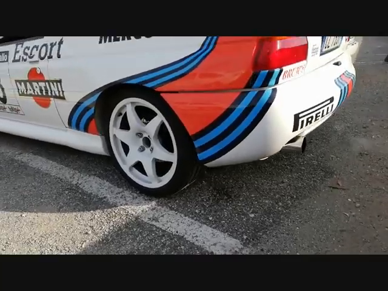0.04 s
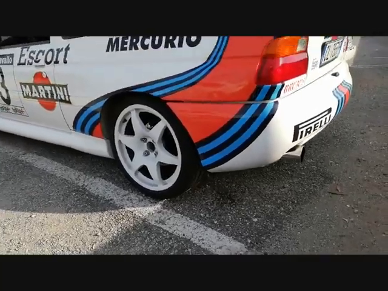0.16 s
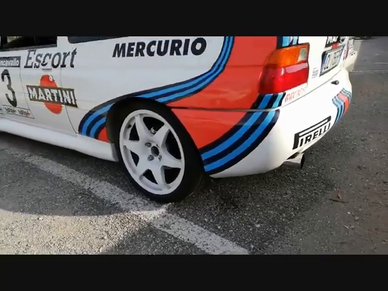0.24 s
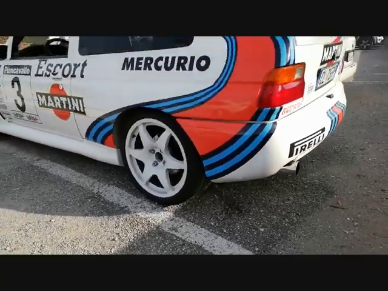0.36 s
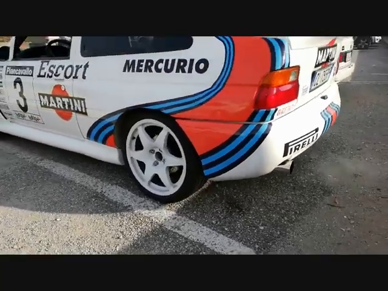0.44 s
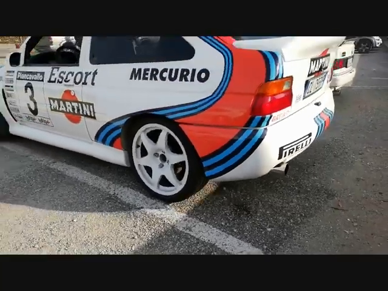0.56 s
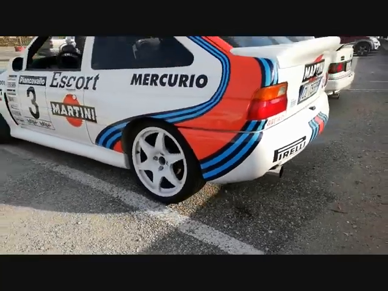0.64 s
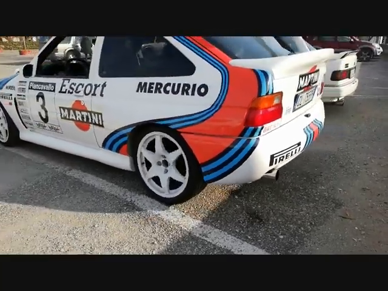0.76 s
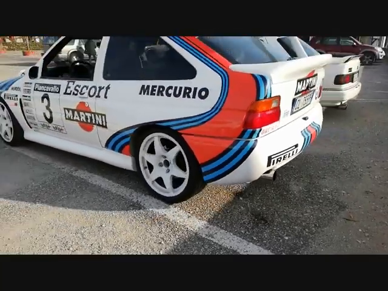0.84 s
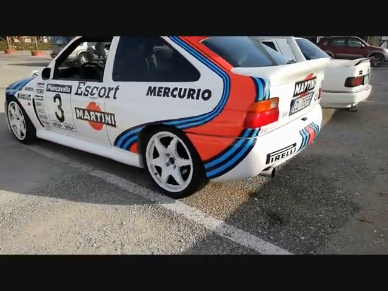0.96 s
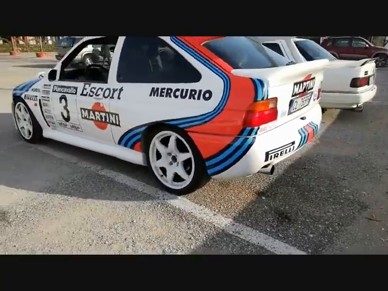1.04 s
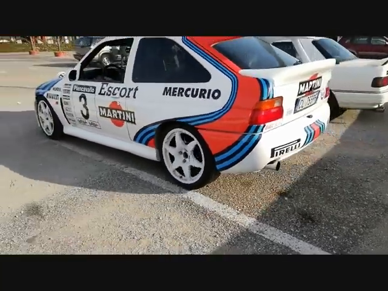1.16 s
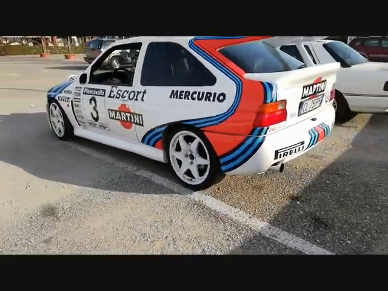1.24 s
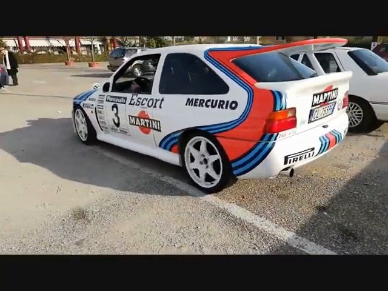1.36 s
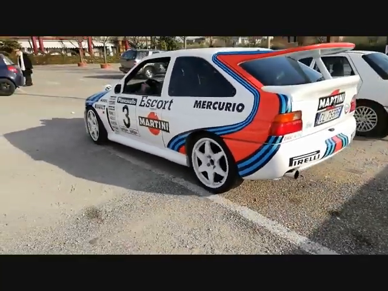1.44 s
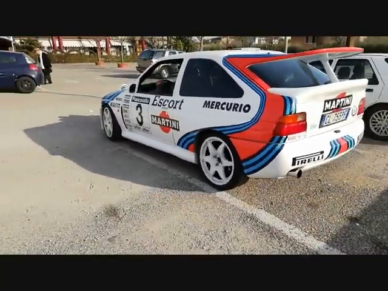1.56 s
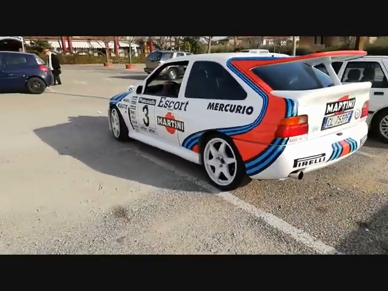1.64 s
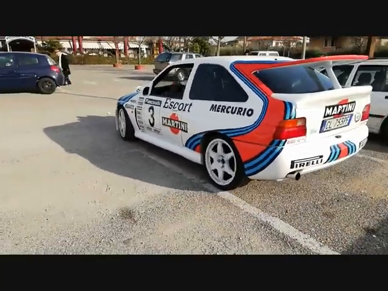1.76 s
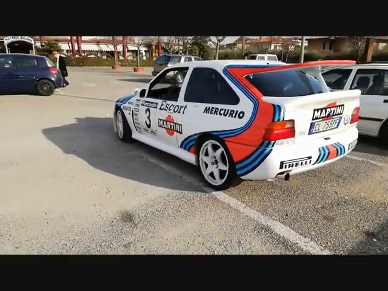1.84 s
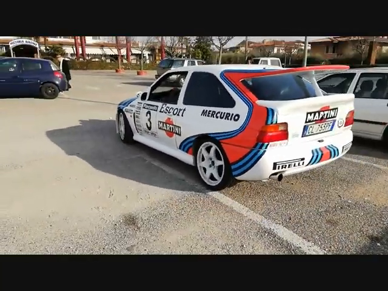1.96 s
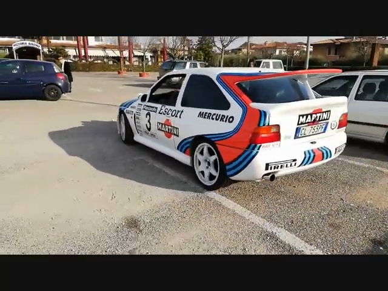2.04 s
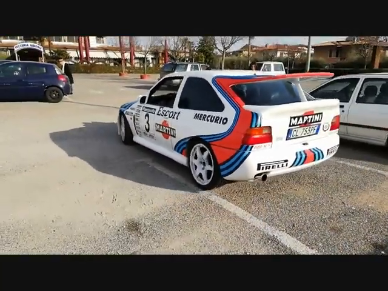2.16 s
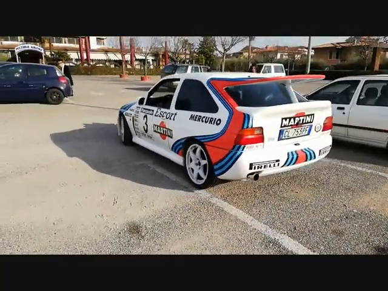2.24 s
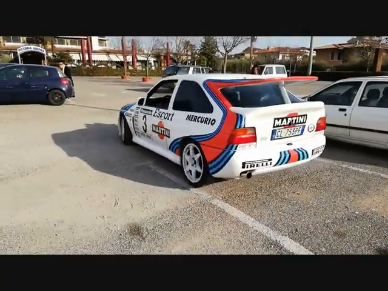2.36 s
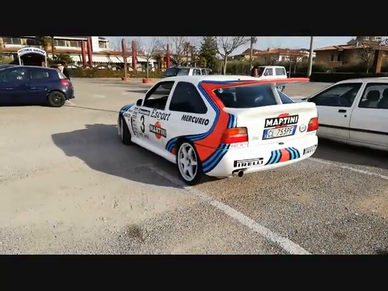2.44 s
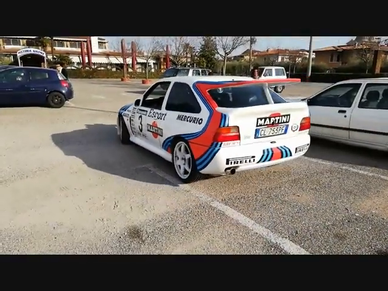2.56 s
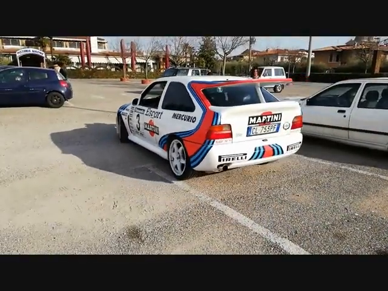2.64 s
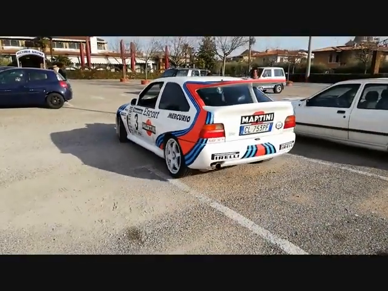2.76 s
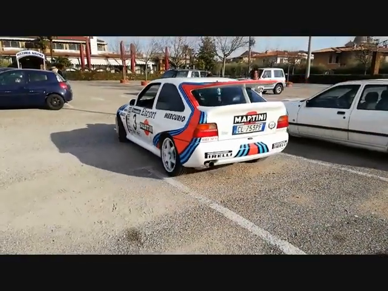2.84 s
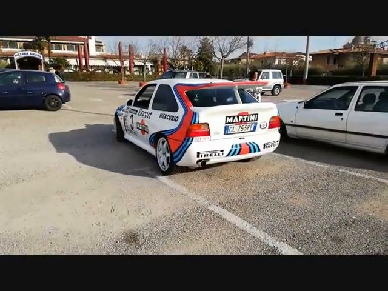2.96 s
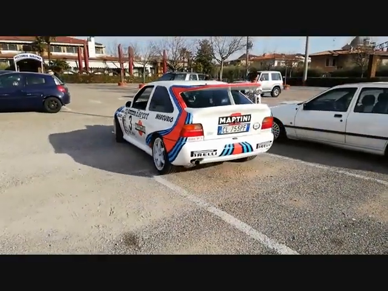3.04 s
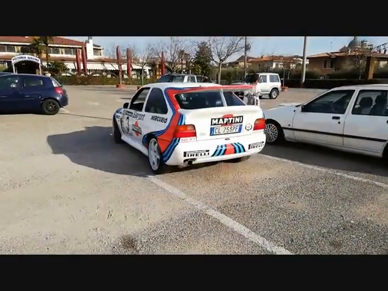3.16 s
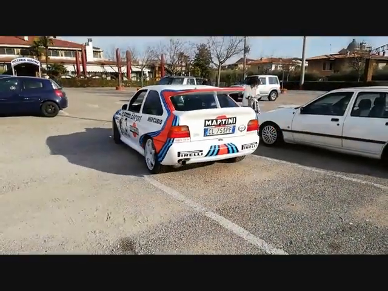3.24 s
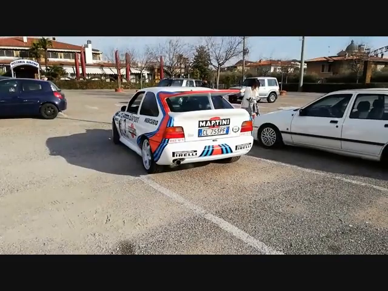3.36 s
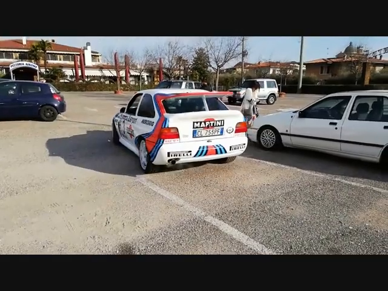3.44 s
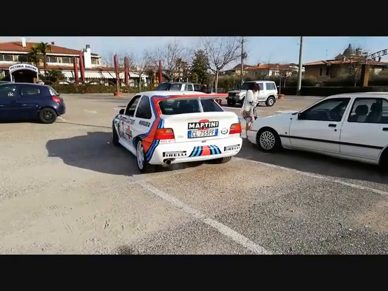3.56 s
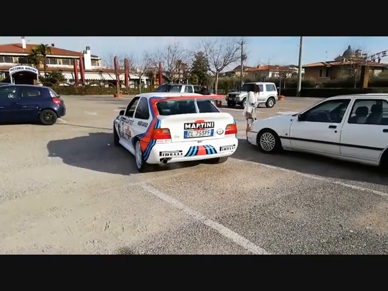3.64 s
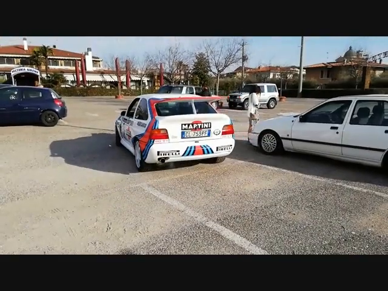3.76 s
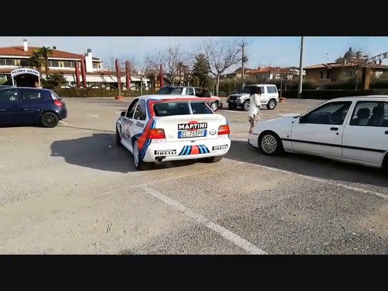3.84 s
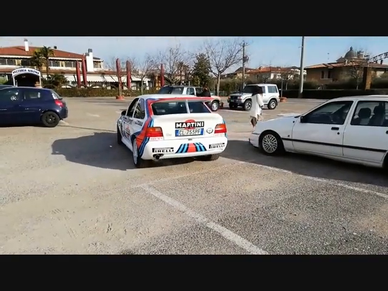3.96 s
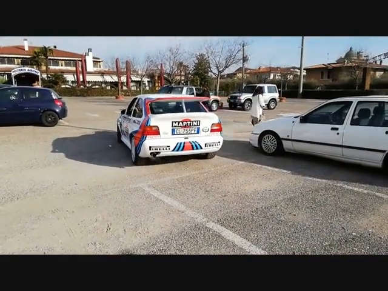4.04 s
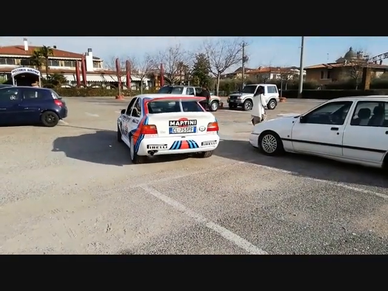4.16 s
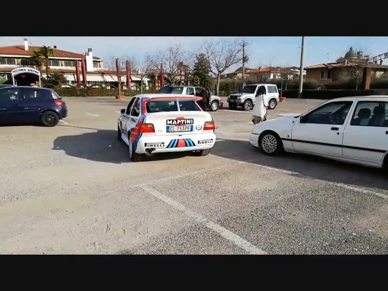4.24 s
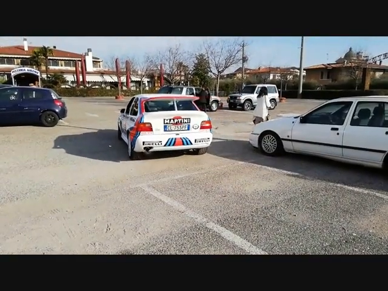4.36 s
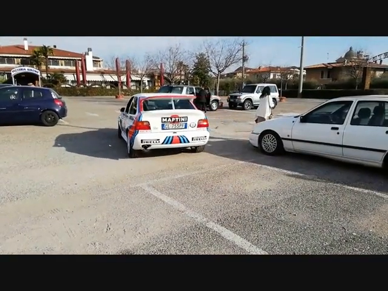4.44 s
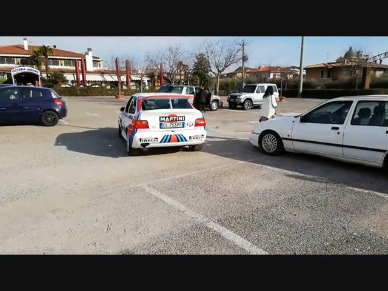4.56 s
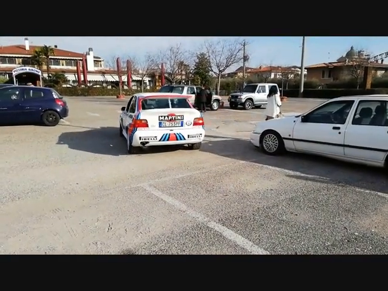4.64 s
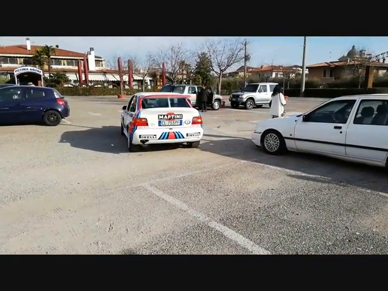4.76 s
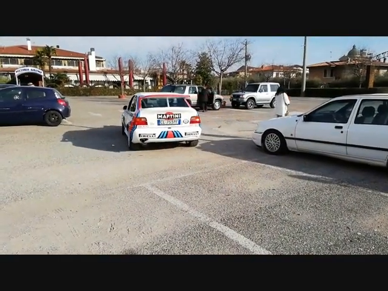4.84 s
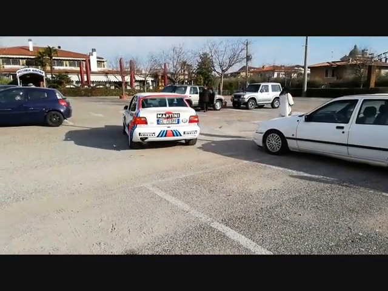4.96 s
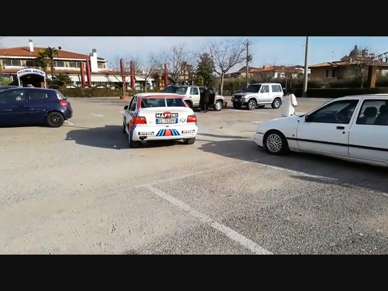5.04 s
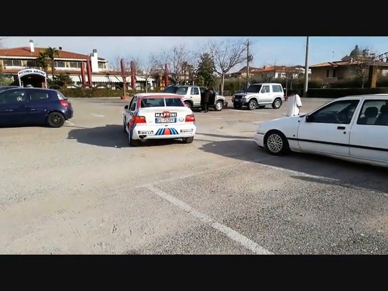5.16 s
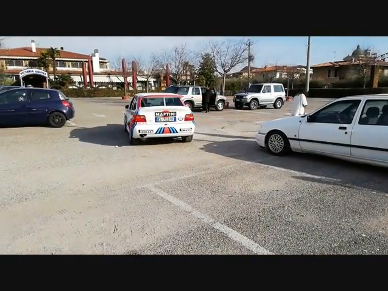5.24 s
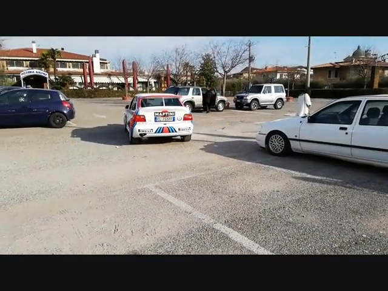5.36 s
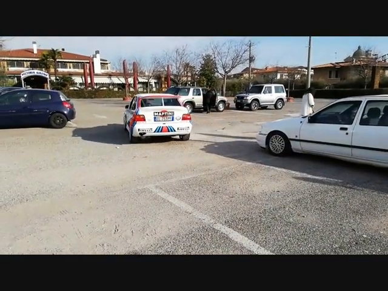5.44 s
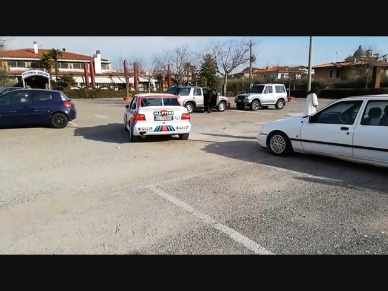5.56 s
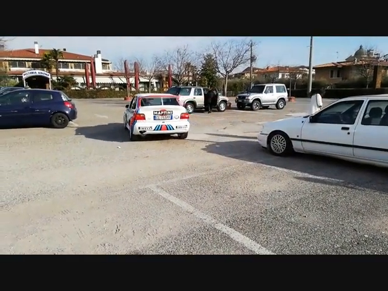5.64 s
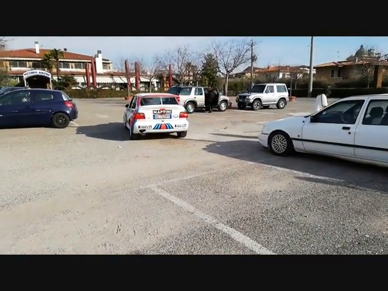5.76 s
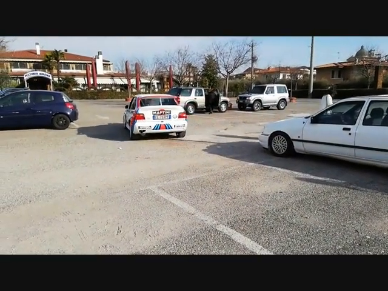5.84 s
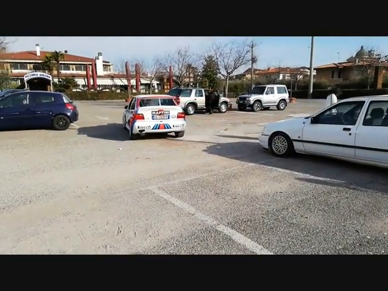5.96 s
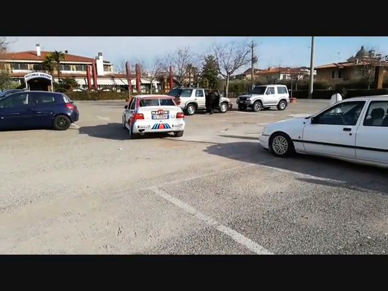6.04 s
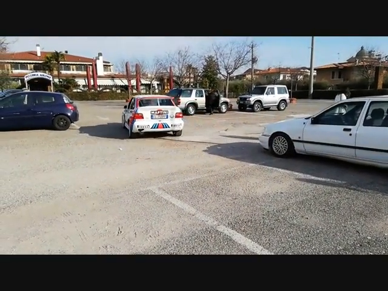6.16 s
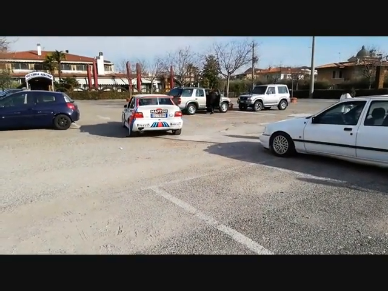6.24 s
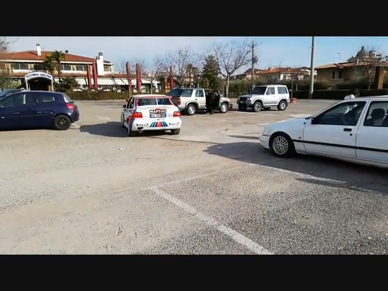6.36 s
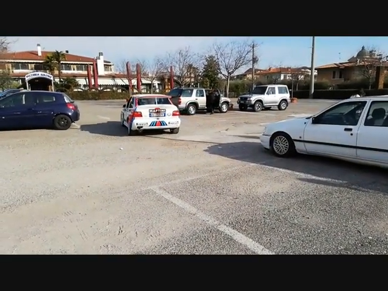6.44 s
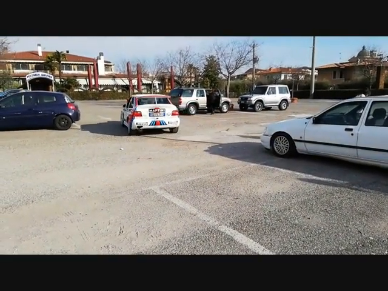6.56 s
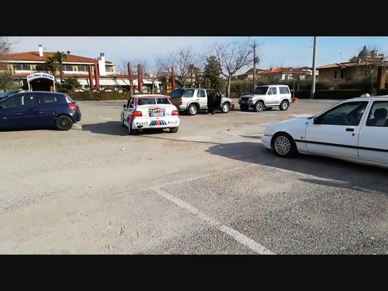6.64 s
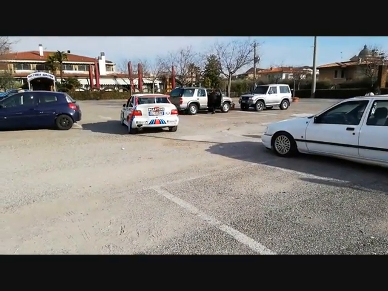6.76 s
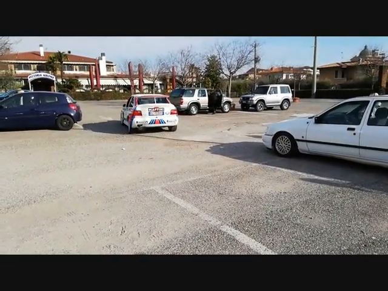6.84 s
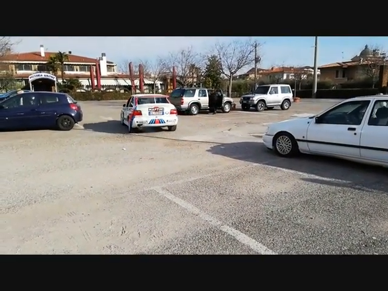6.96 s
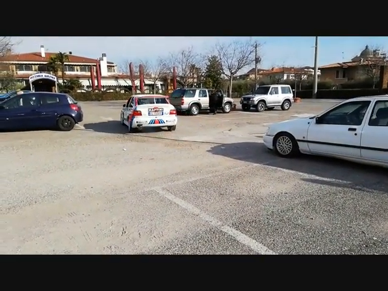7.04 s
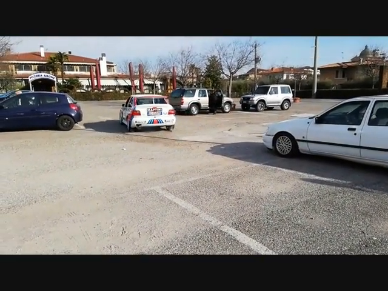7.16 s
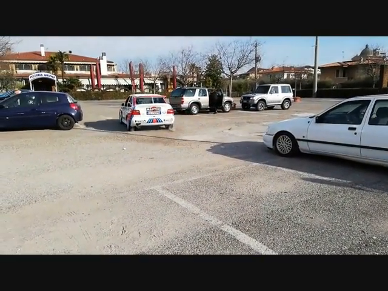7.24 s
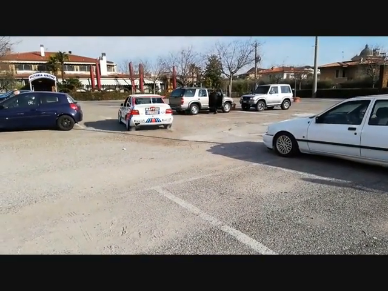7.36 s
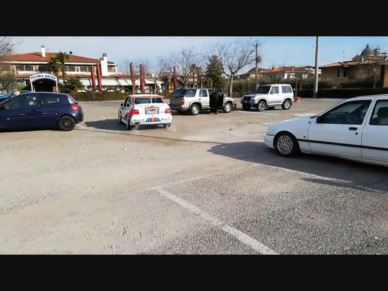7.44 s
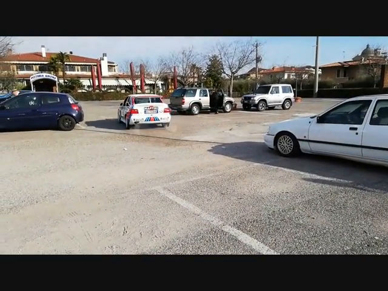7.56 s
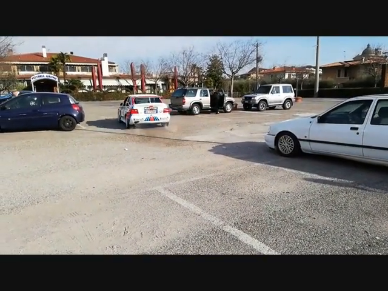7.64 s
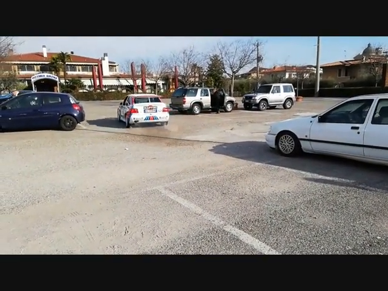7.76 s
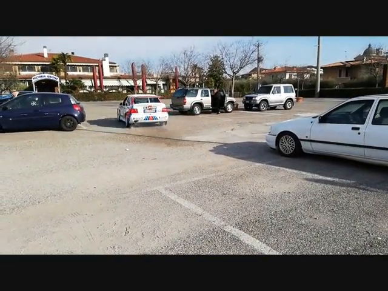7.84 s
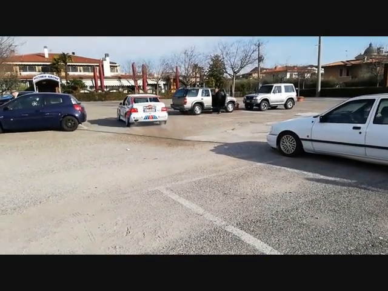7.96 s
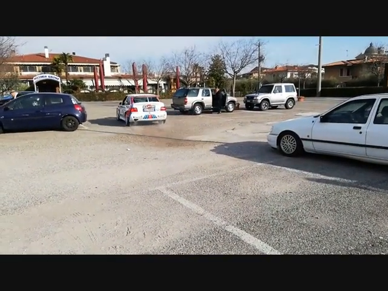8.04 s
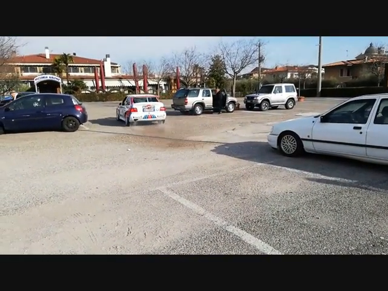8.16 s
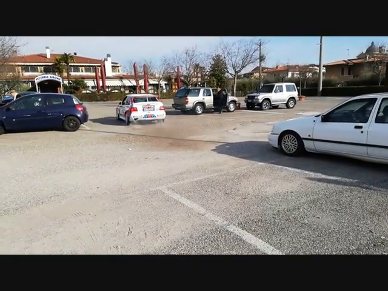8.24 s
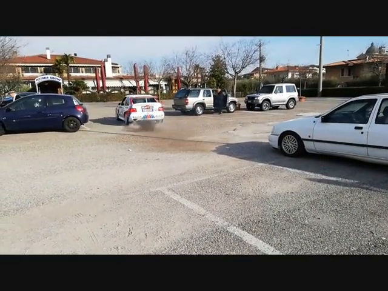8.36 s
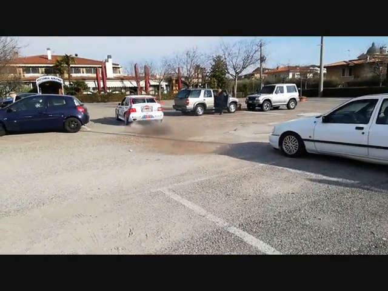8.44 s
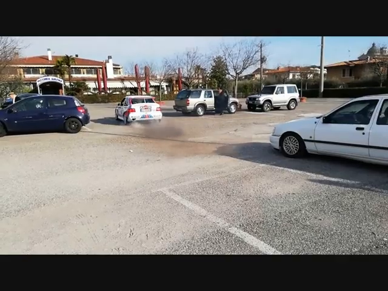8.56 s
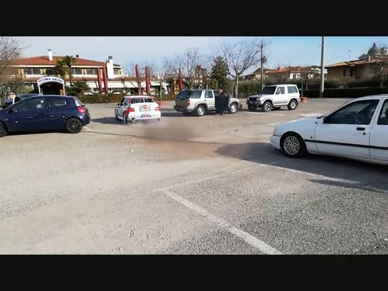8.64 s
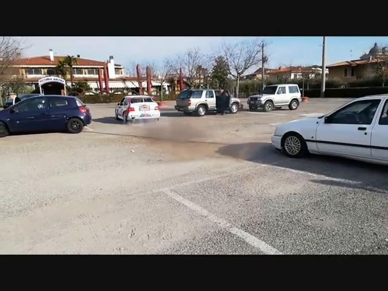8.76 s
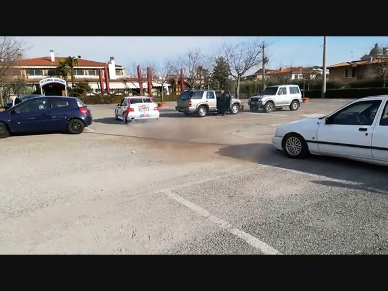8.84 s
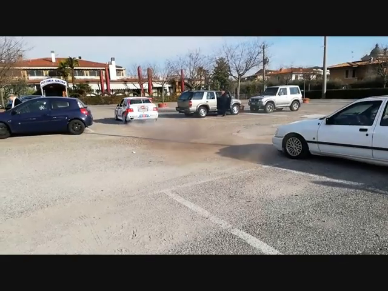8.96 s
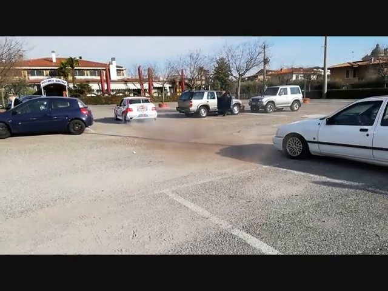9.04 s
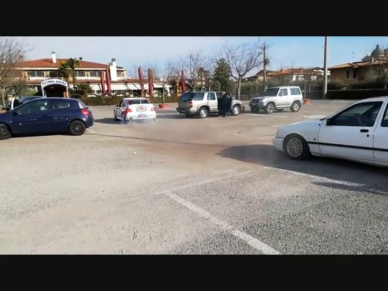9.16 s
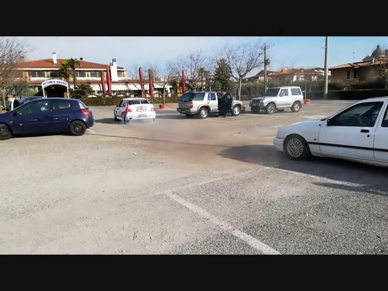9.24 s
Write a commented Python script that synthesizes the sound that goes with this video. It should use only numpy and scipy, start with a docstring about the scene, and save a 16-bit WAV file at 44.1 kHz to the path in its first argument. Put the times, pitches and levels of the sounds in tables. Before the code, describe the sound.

Heard in stereo from behind, a car engine throbs at low, wandering revs while its tyres hiss and knock over small stones in a car park. A bright puff of turbo air comes early and a faint whoosh later, as the drone slowly recedes. In the last third the car launches: the engine rises high, the tyres give a rough, chattering squeal, and the exhaust fires a rapid, uneven string of pops and bangs.

```python
"""A gritty car park, heard from behind a turbocharged four-cylinder car. It rolls away over small stones,
its exhaust pulses blending into a low, uneven drone; the turbo lets off a puff and later whooshes faintly.
Then it is launched: the revs climb, the spinning tyres squeal and throw grit, and unburnt fuel bangs
in the pipe. A handheld stereo microphone listens, its limiter turning down the loudest peaks."""
import sys
import numpy as np
from scipy import signal
from scipy.io import wavfile
from scipy.ndimage import uniform_filter1d, minimum_filter1d

SR = 44100
rng = np.random.default_rng(int(sys.argv[2]) if len(sys.argv) > 2 else 0)


def int16_out(signal):
    """Quantize to a 16-bit WAV file."""
    q = np.round(np.clip(np.atleast_2d(signal).T, -1, 1) * 32767)
    wavfile.write(sys.argv[1], SR, q.astype(np.int16))


N = 410571
TIME_S = np.arange(N) / SR


def amp(db):
    """Turn decibels into a number to multiply by."""
    return 10 ** (np.asarray(db) / 20)


def rms_one(x):
    """Scale a signal to an average strength (rms) of 1."""
    return x / np.sqrt(np.mean(x ** 2) + 1e-20)


def in_time(rows):
    """Join a table's rows with straight lines: one curve for each column after the time."""
    times, *columns = np.transpose(rows)
    return [np.interp(TIME_S, times, column) for column in columns]


def at_hz(rows, hz):
    """Look up the decibels at a pitch in a table of pitches and levels."""
    pitches, levels = np.transpose(rows)
    return np.interp(np.log(hz), np.log(pitches + 1), levels)


def drift(rate_hz):
    """A smooth random wobble of size about 1; a higher rate wobbles faster."""
    step, settle = 32, 2000
    pole = np.exp(-2 * np.pi * rate_hz * step / SR)
    noise = rng.standard_normal(N // step + settle + 2)
    slow = signal.lfilter([1], [1, -2 * pole, pole ** 2], noise)[settle:]
    return np.interp(np.arange(N) / step, np.arange(len(slow)), rms_one(slow - slow.mean()))


def clicks(times_s, sizes):
    """Silence with a single click at each time."""
    out = np.zeros(N)
    out[np.minimum((times_s * SR).round().astype(int), N - 1)] = sizes
    return out


def ring(hits, hz, fade_s):
    """Each hit starts a tone that dies away by 60 dB in fade_s."""
    decay, angle = 10 ** (-3 / (fade_s * SR)), 2 * np.pi * hz / SR
    return signal.lfilter([0, np.sin(angle)], [1, -2 * decay * np.cos(angle), decay ** 2], hits + 1e-18)


# How wide each pitch sounds: pitch_hz, side_over_middle_db
STEREO_WIDTH = [(60, -84), (110, -104), (200, -14), (380, -1), (690, 4), (1270, -5), (2340, -1.5),
                (4320, 0), (7960, -6.5), (14700, 0)]
# Which way each pitch leans: pitch_hz, left_over_right_db
STEREO_LEAN = [(60, -5.5), (110, 1), (200, 4), (380, -3), (690, -1.5), (1270, -2.5), (2340, -4.5),
               (4320, -1.5), (7960, 0.5), (14700, -5.5)]

def stereo(middle, unrelated, hz):
    """Make left and right; part of the width is the same sound reaching one side a little late."""
    late_share = 0.44
    side = late_share * np.roll(middle, int(SR / hz / 4)) + np.sqrt(1 - late_share ** 2) * unrelated
    side *= amp(at_hz(STEREO_WIDTH, hz))
    lean = amp(at_hz(STEREO_LEAN, hz) / 2)
    return np.array([(middle + side) * lean, (middle - side) / lean])


def banded_noise(colour, flicker_db, flicker_hz, tilt_db=0., per_octave=2.5):
    """Stereo noise of strength 1, built from bands that flicker partly alone and partly together."""
    low, high = colour[0][0], colour[-1][0]
    edges = np.geomspace(low, high, int(per_octave * np.log2(high / low)) + 2)
    white = rng.standard_normal((2, 2, N))
    together, out = drift(flicker_hz), 0
    for k, band in enumerate(zip(edges, edges[1:])):
        band_filter = signal.butter(2, band, "band", fs=SR, output="sos")
        middle, unrelated = signal.sosfilt(band_filter, white[k % 2])
        hz = np.sqrt(band[0] * band[1])
        band_db = at_hz(colour, hz) + tilt_db * np.log2(hz / 6500)
        wobble_db = flicker_db * (0.58 * together + drift(flicker_hz))
        out += amp(band_db + wobble_db) * stereo(middle, unrelated, hz)
    return out / np.sqrt(np.mean(out.mean(axis=0) ** 2))


def whistle(pitch_hz, width_hz):
    """A rough stereo tone: noise packed closely around one pitch, which may glide."""
    phase = 2 * np.pi * np.cumsum(pitch_hz * np.ones(N)) / SR
    cos, sin = np.cos(phase), np.sin(phase)
    middle, unrelated = (drift(width_hz) * cos + drift(width_hz) * sin for _ in range(2))
    return stereo(middle, unrelated, np.mean(pitch_hz))


# Air rushing through the turbocharger: time_s, pitch_hz, level_db
TURBO_AIR = [(4.95, 1867, -46), (5.1, 1939, -43), (5.28, 2084, -42), (5.38, 1727, -42), (5.6, 1705, -43.5),
             (5.9, 1682, -40.5), (6.1, 1847, -41.5), (6.25, 1890, -65)]

def turbo_whoosh():
    """The turbo blows faintly: two bands of air noise gliding together."""
    pitch_hz, level_db = in_time(TURBO_AIR)
    blowing = (TIME_S > TURBO_AIR[0][0]) & (TIME_S < TURBO_AIR[-1][0])
    air = whistle(pitch_hz, width_hz=240) + amp(-10.5) * whistle(1.55 * pitch_hz, width_hz=199.8)
    return amp(level_db) * blowing * air


# Hiss of tyres on grit, with a short, bright puff of turbo blow-off at about 1 s: time_s, level_db
HISS_LEVEL = [(0, -44.5), (.46, -46.5), (.81, -49), (1.02, -40), (1.2, -46.5), (1.42, -45), (3.0, -45),
              (3.07, -51), (3.32, -46.5), (3.57, -52), (3.88, -47), (4.46, -50.5), (5.13, -48),
              (5.9, -46.5), (6.21, -48.5), (6.65, -44.5), (6.95, -35), (7.3, -32.5), (7.82, -38),
              (8.21, -31), (8.46, -35.5), (9.31, -33)]
# How bright the hiss is, brightest in that puff: time_s, tilt_db_per_octave
HISS_BRIGHTNESS = [(0, -3.5), (.6, 3), (.81, -1.5), (1.02, 8.5), (1.42, -1.9), (3, -0.5), (4.5, -0.7),
                   (6.2, -4), (6.65, -0.5)]
# The mix of low and high in the tyre roar: pitch_hz, level_db
ROAR_COLOUR = [(500, -45), (800, 3), (1300, 5.5), (1700, 6), (2050, -3.5), (2400, -10), (3200, -2)]
# The same for the hiss of grit and gas: pitch_hz, level_db
HISS_COLOUR = [(1760, -14), (3000, -3), (4240, -7), (4750, -2.5), (6800, -6.5), (7730, -8.5), (8850, 2),
               (9730, -0.5), (10700, 3), (14000, -29.5), (15100, -23)]

def roar_and_hiss(puffs, jet):
    """Tyres roar and hiss on grit and the turbo lets off air; the noise also swells with exhaust gas."""
    level_db, = in_time(HISS_LEVEL)
    tilt_db, = in_time(HISS_BRIGHTNESS)
    roar = banded_noise(ROAR_COLOUR, flicker_db=1.5, flicker_hz=27.6)
    hiss = banded_noise(HISS_COLOUR, flicker_db=1.58, flicker_hz=18, tilt_db=tilt_db, per_octave=3.6)
    return (amp(level_db + 6) * puffs + 0.98 * jet) * roar + (amp(level_db) * puffs + jet) * hiss


# How loud the exhaust gas rumbles: time_s, level_db
RUMBLE_LEVEL = [(0, -29), (.5, -31.5), (1.2, -31), (3.0, -32.5), (3.6, -36.5), (4.5, -33.5), (5.9, -35),
                (6.65, -32), (6.95, -24), (7.5, -27.5), (8.05, -21.5), (8.46, -21), (9.31, -20.5)]
# The mix of low and high in that rumble: pitch_hz, level_db
RUMBLE_COLOUR = [(20, -48), (50, 1.5), (120, 5.5), (220, 5), (330, -3), (600, -10.5), (850, -11)]

def gas_rumble(puffs, jet):
    """Gas leaving the pipe makes a low noise that throbs with each firing and surges with each bang."""
    level_db, = in_time(RUMBLE_LEVEL)
    rumble = banded_noise(RUMBLE_COLOUR, flicker_db=2.0, flicker_hz=10.4)
    return (amp(level_db) * puffs ** 4.5 + 4.1 * jet) * rumble


# The tailpipe's rasp while the car is close: time_s, level_db
RASP_LEVEL = [(0, -48), (.35, -64), (.6, -36), (.8, -61), (1.13, -41.5), (1.4, -58)]

def tailpipe_rasp(firings):
    """Every firing sends a short burst of noise ringing through the tailpipe."""
    level_db, = in_time(RASP_LEVEL)
    close = TIME_S < RASP_LEVEL[-1][0]
    bursts = rms_one(np.cos(np.pi * firings) ** 4)
    return amp(level_db) * close * bursts * whistle(642, width_hz=99)


# Stones under the rolling car: start_s, knock_db, pitch_hz, snap_db
STONE_HITS = [(0.622, -27, 1210, -51), (0.997, -19, 1490, -38), (1.07, -24, 1330, -48),
              (2.014, -18, 874, -27), (2.178, -20, 1010, -51), (2.454, -24, 1319, -29),
              (2.585, -20, 1580, -43), (2.789, -22, 1654, -59), (2.875, -28, 1538, -23.5),
              (2.921, -35, 874, -30), (3.16, -26, 1500, -39), (3.209, -27.5, 1667, -32),
              (3.252, -30, 1020, -49), (3.292, -38, 1485, -45), (3.305, -17.5, 1020, -25),
              (3.364, -30, 1010, -44), (3.376, -20, 1050, -46), (3.425, -16, 1130, -45.5),
              (3.633, -29, 1230, -65), (3.791, -27, 883, -28), (3.867, -26, 1313, -40),
              (4.169, -28, 1333, -28), (4.586, -20.5, 1166, -58), (4.68, -27, 1167, -53),
              (4.944, -19, 1533, -49), (4.952, -19, 1570, -51), (5.006, -21, 1130, -56),
              (5.026, -18.5, 1150, -55), (5.057, -17, 1000, -51), (5.113, -19, 1110, -57)]

def stones():
    """Each stone knocks a short ring out of the car's underside, with a crunch and a bright snap."""
    out = np.zeros((2, N))
    t = TIME_S[:int(.03 * SR)]
    crunch_band = signal.butter(1, [750, 2200], "band", fs=SR, output="sos")
    snap_band = signal.butter(2, [2500, 11500], "band", fs=SR, output="sos")
    pans_db = rng.normal(0, 3, len(STONE_HITS))
    for (start_s, knock_db, pitch_hz, snap_db), pan_db in zip(STONE_HITS, pans_db):
        noise = rng.standard_normal(len(t))
        blunt = np.clip((knock_db - snap_db - 23.5) / 10, 0, 1)  # blunt hits ring on, sharp ones crunch
        knock = np.sin(2 * np.pi * pitch_hz * t) * np.exp(-t / (.0007 + .0011 * blunt))
        crunch = 0.84 * (1 - 0.9 * blunt) * signal.sosfilt(crunch_band, noise) * np.exp(-t / 0.0066)
        snap = signal.sosfilt(snap_band, noise) * np.exp(-t / 0.0017)
        hit = amp(knock_db) * (knock + crunch) + amp(snap_db - 4) * snap
        start = round(start_s * SR)
        out[:, start:start + len(t)] += hit * amp([[pan_db], [-pan_db]])
    return out


# The squeal of the spinning tyres: time_s, level_db, pitch_hz
TYRE_SPIN = [(7.081, -34, 1150), (7.13, -12, 1130), (7.22, -14.5, 1120), (7.29, -12, 1130),
             (7.34, -21, 1190), (7.38, -10, 1100), (7.43, -17, 1180), (7.79, -16.5, 1110),
             (7.83, -27, 1110), (7.97, -17.5, 1120), (8.12, -26, 1170), (8.262, -17.5, 1270),
             (8.299, -21, 1200), (8.319, -12.5, 1100), (8.36, -25, 1140), (8.5, -27.5, 1200),
             (8.52, -19, 1200), (8.58, -22, 1180), (8.6, -21, 1180), (8.82, -17, 1230), (8.9, -18.5, 1190),
             (9.07, -21.5, 1100), (9.31, -19.5, 1150)]
# The rough tones in that squeal: pitch_multiple, width_hz, level_db
TREAD_TONES = [(.9, 47, 2), (1.0, 30.3, 3.5), (1.12, 45, 2), (1.45, 163, -3)]

def tyre_squeal():
    """Tread blocks stick and slip: a cluster of rough tones glides over a lower moan of steady pitch."""
    start_s, _, start_hz = TYRE_SPIN[0]
    level_db, pitch_hz = in_time([(start_s - .05, -70, start_hz)] + list(TYRE_SPIN))  # quick fade in
    tones = sum(amp(db) * whistle(multiple * pitch_hz, width) for multiple, width, db in TREAD_TONES)
    tones /= tones.mean(axis=0).std()
    moan_db = -11.5 + 0.55 * np.maximum(level_db + 19, -10)  # stands out more in a loud squeal
    moan = amp(moan_db) * whistle(884, width_hz=136)
    chatter_db = 2.1 * drift(46)  # all the blocks chatter together in short bursts
    return amp(level_db + chatter_db) * (tones + moan)


# The revs, wandering on the slipping clutch and then climbing: time_s, firings_per_s
REVS = [(0.0, 73.2), (0.2, 82.1), (0.34, 70.2), (0.41, 63.1), (0.57, 59.0), (0.75, 59.6), (0.83, 54.6),
        (0.93, 47.1), (1.06, 54.1), (1.27, 69.9), (1.53, 66.6), (1.72, 57.2), (1.92, 64.5), (2.1, 61.9),
        (2.41, 53.4), (2.77, 51.0), (3.01, 45.5), (3.5, 36.9), (3.76, 40.9), (4.12, 50.7), (4.69, 60.8),
        (4.87, 55.5), (5.05, 43.2), (5.21, 37.5), (5.5, 46.0), (5.91, 44.4), (6.07, 50.2), (6.22, 68.3),
        (6.35, 88.4), (6.45, 77.4), (6.58, 87.8), (6.71, 118.0), (6.84, 144.0), (7.0, 169.5), (7.26, 158.3),
        (7.86, 189.6), (7.96, 197.7), (8.19, 232.0), (8.35, 215.9), (8.48, 210.0), (8.74, 236.7),
        (8.92, 208.3), (9.05, 221.4), (9.18, 227.4), (9.31, 243.1)]

def engine_speed():
    """How fast the cylinders fire, and a running count of their firings."""
    firing_hz, = in_time(REVS)
    return firing_hz, np.cumsum(firing_hz) / SR


# The drone as the throttle moves and the car draws away: time_s, level_db, overtone_lift_db
DRONE_LEVEL = [(0.0, -21, 2.5), (0.2, -11.5, -6.5), (0.38, -20, -6.2), (0.48, -18.2, 1), (0.75, -19.3, 1.7),
               (0.83, -19.9, -7), (1.0, -15.5, -4), (1.2, -20, -1.9), (1.5, -21, -7.5),
               (1.68, -19.5, -14.5), (1.76, -23, 7.5), (1.92, -21.5, 3.5), (2.01, -22, -11.5),
               (2.1, -22.1, 7), (2.3, -23.2, 1.5), (2.4, -21.0, -0.7), (3.0, -22, 2.6), (3.5, -25, 8),
               (3.8, -23.5, 6.5), (4.1, -24, -1.0), (4.7, -30, 10.5), (5.0, -26, -5.5), (5.2, -27, -4),
               (5.5, -27.5, 3), (5.85, -30, -6.5), (6.2, -22.5, 5), (6.4, -33, 7), (6.65, -22.0, 2.5),
               (7.0, -16.5, -2), (7.06, -29, 7), (7.26, -21.5, 2.5), (7.86, -22, 1.3), (8.15, -12, -2.5),
               (8.35, -30, -5), (8.72, -12, -8), (8.9, -26, 2), (9.05, -17.6, -4), (9.31, -15.5, -4)]
# How the pipe and microphone boost or weaken each pitch: pitch_hz, gain_db
PIPE_COLOUR = [(30, 0), (38, -7.5), (45, 4), (55, 9.5), (70, 10), (90, -.5), (105, -1), (120, 2),
               (135, 1.5), (155, 2), (180, 8), (205, 5.5), (240, -3.5), (270, -5), (320, -11.5),
               (420, -2.5), (520, -11)]
# High overtones of the sharp exhaust pulse: firing_multiple, level_against_fourth_db
HIGH_OVERTONES = [(5, -6), (6, -11), (7, -11), (8, -5)]
# In-between tones from cylinders firing unevenly: firing_multiple, level_db
UNEVEN_TONES = [(.5, 0), (.75, -8), (1.25, -14.5), (1.5, -8)]

def exhaust_drone(firing_hz, firings):
    """Exhaust pulses blend into wavering tones that follow the revs, shaped by the pipe and silencer."""
    level_db, lift_db = in_time(DRONE_LEVEL)

    def tone(multiple, db, waver_db, phase=0.):
        """One tone at a multiple of the firing rate, its level wavering."""
        size = np.sqrt(2) * amp(db + waver_db * drift(19.7))
        return size * np.cos(2 * np.pi * multiple * firings + phase)

    def piped_db(multiple):
        """A tone's level after the pipe."""
        return level_db + at_hz(PIPE_COLOUR, multiple * firing_hz)

    def silencer_db(multiple):
        """The silencer takes away 36 dB for each octave above 235 Hz."""
        return -36 * np.maximum(np.log2(multiple * firing_hz / 235), 0)

    fourth_db = piped_db(4) - 15.5 + lift_db
    out = tone(1, piped_db(1), waver_db=0.7)
    out += tone(2, piped_db(2) - 6.5 + lift_db, waver_db=1.5, phase=2.4)
    out += tone(3, piped_db(3) - 12.5 + lift_db, waver_db=1.8, phase=5.2)
    out += tone(4, fourth_db, waver_db=2.0, phase=7.6)
    for multiple, db in HIGH_OVERTONES:
        overtone_db = fourth_db + db + silencer_db(multiple) - silencer_db(4)
        out += tone(multiple, overtone_db, waver_db=2.2, phase=2.4 * multiple)
    uneven_db = -17.5 - 5.5 * np.log2(firing_hz / firing_hz.min())  # cylinders even out as revs climb
    for multiple, db in UNEVEN_TONES:
        out += tone(multiple, piped_db(multiple) + uneven_db + db, waver_db=8.5)
    return np.array([np.roll(out, 8), out])  # the pipe is a little nearer the microphone's right side


# Fuel exploding in the exhaust: start_s, level_db, crack_against_ring_db, boom_db, jet_db
FUEL_BANGS = [(7.052, -8.5, -6.5, -17, -45), (7.15, -24, -7, -22, -32), (7.236, -1.5, -9, -32, -28),
              (7.44, -20, -9, -27, -49), (7.518, -3.5, -9, -23, -27), (7.574, -16, -6, -22, -43),
              (7.723, -5, -13, -24, -32.5), (7.801, 4, -5.5, -27, -27.5), (7.874, -4.5, -13, -31, -59),
              (8.035, -1.5, -2, -29, -23), (8.093, -12, 3, -41, -36), (8.326, -7, 2, -28, -13.5),
              (8.392, -0.5, 6.5, -33, -13), (8.453, -11, 0, -39, -34), (8.539, -5, 6.5, -31, -22.5),
              (8.675, -3, -9, -20.5, -26.5), (8.78, -18, -9, -25, -42), (8.849, 3, -2, -36, -8.5),
              (8.933, 3.5, -15.5, -25, -35), (9.169, -3, -2, -24, -33), (9.208, -2, -7, -17, -45)]
# The notes the pipe rings at, lowest first: pitch_hz, level_db, fade_s
PIPE_NOTES = [(173.4, -3, 0.084), (370, 4.5, 0.007), (566, -23, 0.01)]

def exhaust_bangs():
    """A pressure spike cracks and the pipe rings and booms. Returns that and the gas jet's level."""
    start_s, level_db, crack_db, boom_db, jet_db = np.transpose(FUEL_BANGS)
    push = np.hanning(round(.0017 * SR))
    spike = np.convolve(clicks(start_s, amp(level_db + crack_db + 6)), push)[:N]
    rebound = .4 * np.roll(spike, round(.0016 * SR))
    shove = np.convolve(clicks(start_s + .0013, amp(level_db + 2.5)), push)[:N]
    bang = spike - rebound
    for k, (pitch_hz, note_db, fade_s) in enumerate(PIPE_NOTES):
        drive = shove if k == 0 else spike  # the crack rings all but the lowest note
        bang -= amp(note_db) * ring(drive / push.sum(), pitch_hz, fade_s)
    echo_s = .0085  # off the parked cars
    echo = amp(1) * np.roll(bang, round(echo_s * SR))
    boom = ring(clicks(start_s - .013, amp(boom_db + 9.5)), hz=63.4, fade_s=0.27)  # ahead of the crack
    t = TIME_S[:round(.06 * SR)]
    jet_shape = t / 0.0065 * np.exp(1 - t / 0.0048)
    jet = signal.oaconvolve(clicks(start_s + echo_s - .001, amp(jet_db)), jet_shape)[:N]
    return np.array([bang + 0.47 * echo, bang + 0.14 * echo]) - boom, jet


def scene():
    """Add up the car's sounds, with the drone, rasp and gas noise all in step with the firings."""
    firing_hz, firings = engine_speed()
    puffs = 1 + 0.062 * np.cos(2 * np.pi * firings)  # gas noise swells with every firing
    bangs, jet = exhaust_bangs()
    background = gas_rumble(puffs, jet) + roar_and_hiss(puffs, jet)
    engine = exhaust_drone(firing_hz, firings) + tailpipe_rasp(firings)
    return background + engine + tyre_squeal() + turbo_whoosh() + stones() + bangs


def record(dry):
    """A limiter turns the sound down just before each big peak; deep bass and top treble are cut."""
    ceiling_db, recovery_db_per_s, look_ahead_s = -.4, 190, .005
    over_db = np.maximum(20 * np.log10(np.abs(dry).max(axis=0) + 1e-9) - ceiling_db, 0)
    recovery_db = recovery_db_per_s * TIME_S
    cut_db = np.maximum.accumulate(over_db + recovery_db) - recovery_db
    window = round(look_ahead_s * SR) + 1
    cut_db = uniform_filter1d(-minimum_filter1d(-cut_db, window), window)  # widen and smooth each dip
    out = signal.sosfilt(signal.ellip(10, .5, 80, 15250, fs=SR, output="sos"), dry * amp(-cut_db))
    out = signal.sosfilt(signal.butter(4, 30, "high", fs=SR, output="sos"), out)
    return np.clip(out, -1, 1)


dry = scene()
out = record(dry)
int16_out(out)
```